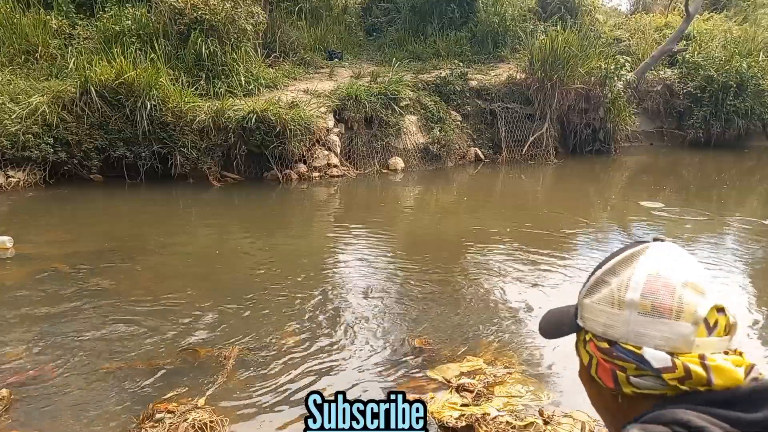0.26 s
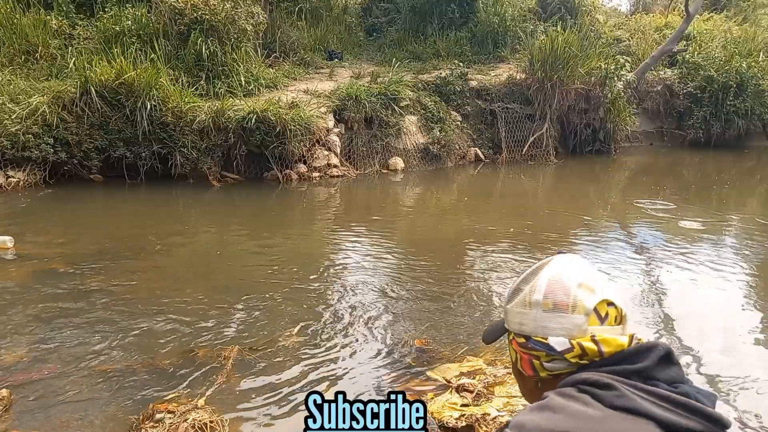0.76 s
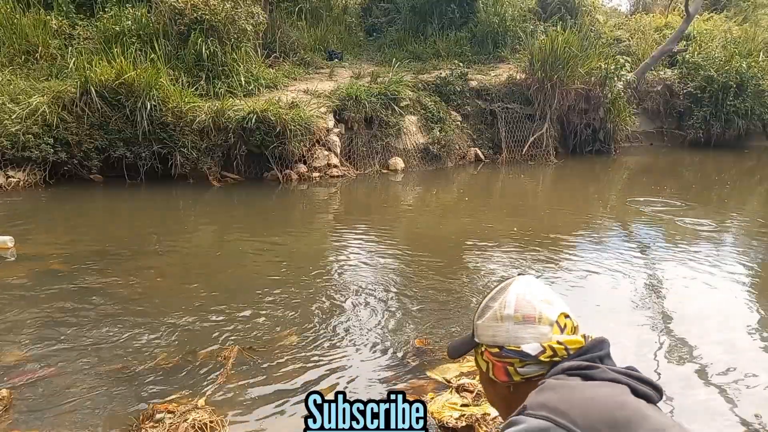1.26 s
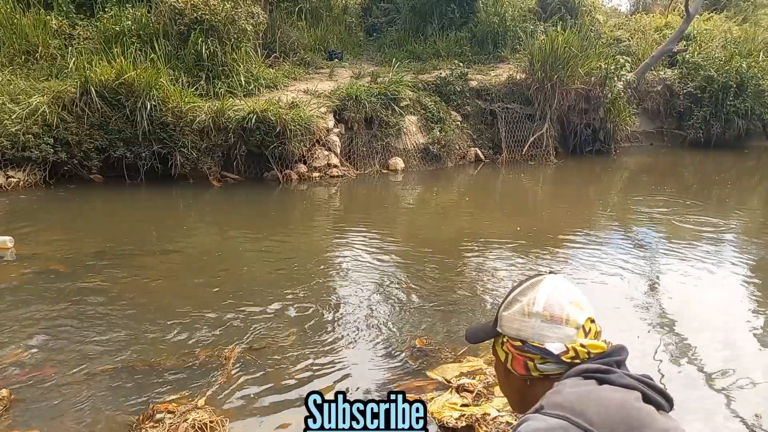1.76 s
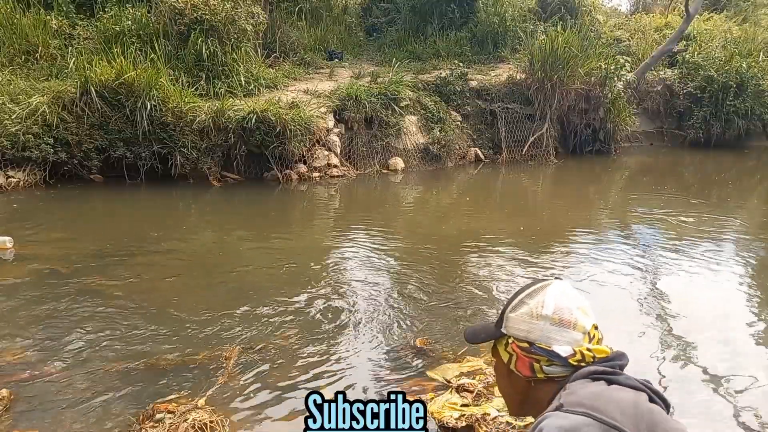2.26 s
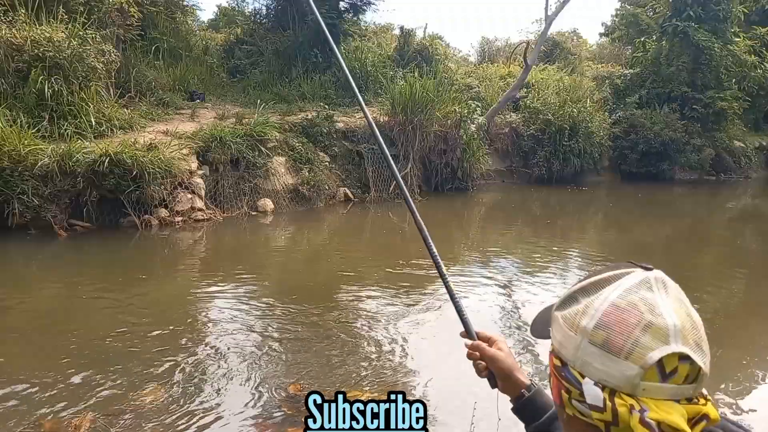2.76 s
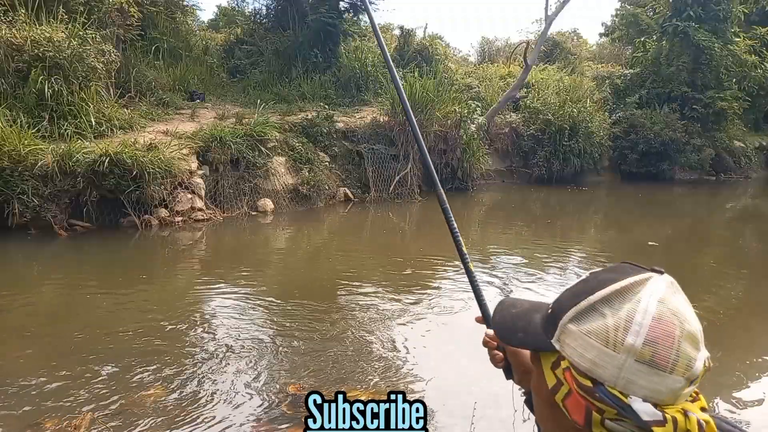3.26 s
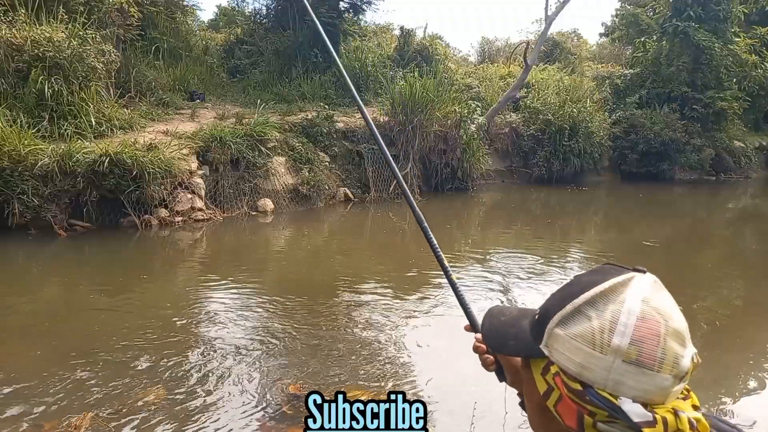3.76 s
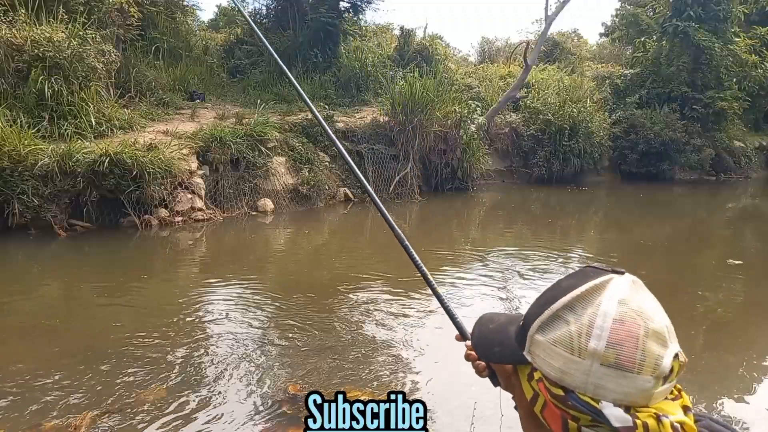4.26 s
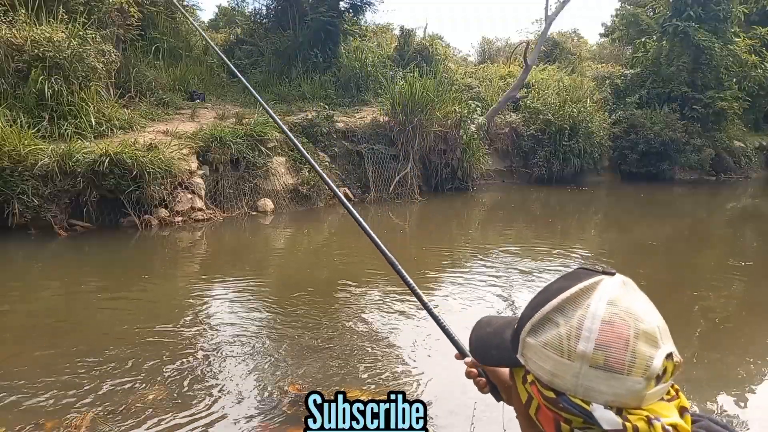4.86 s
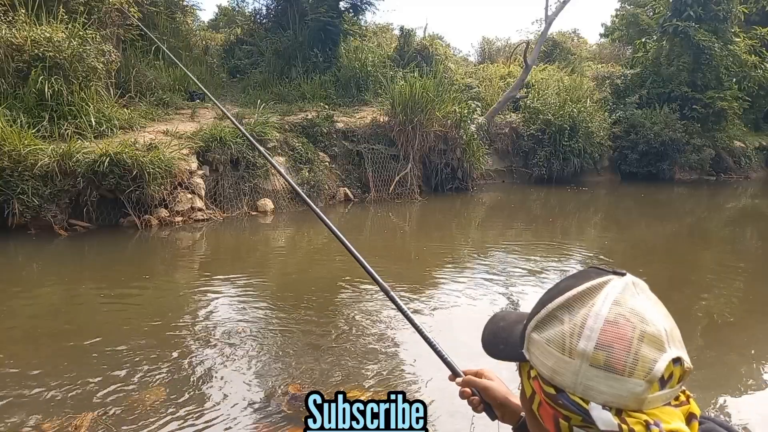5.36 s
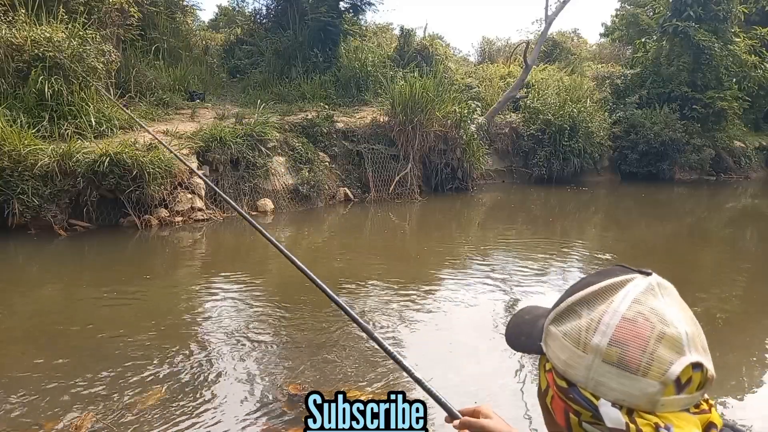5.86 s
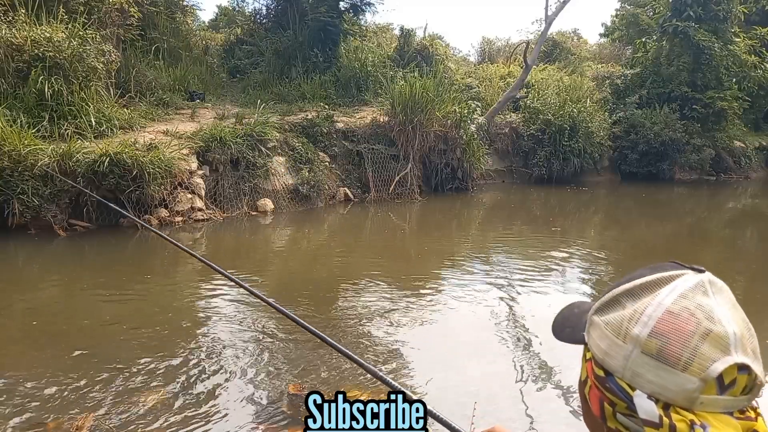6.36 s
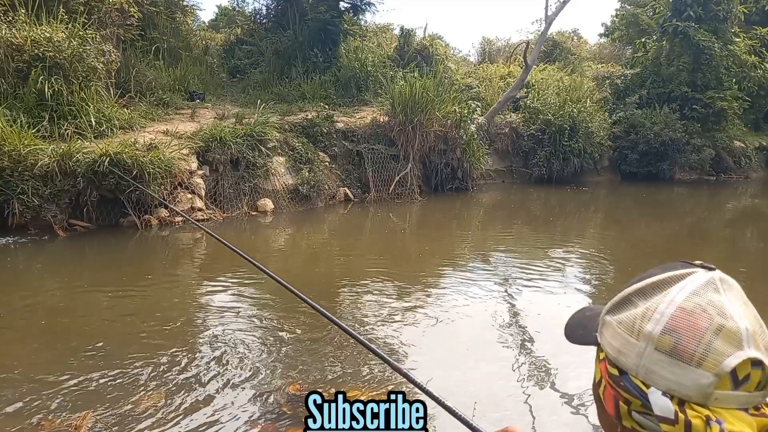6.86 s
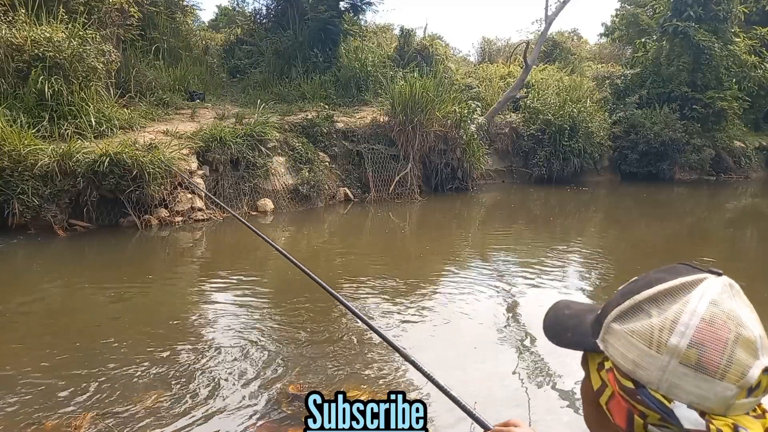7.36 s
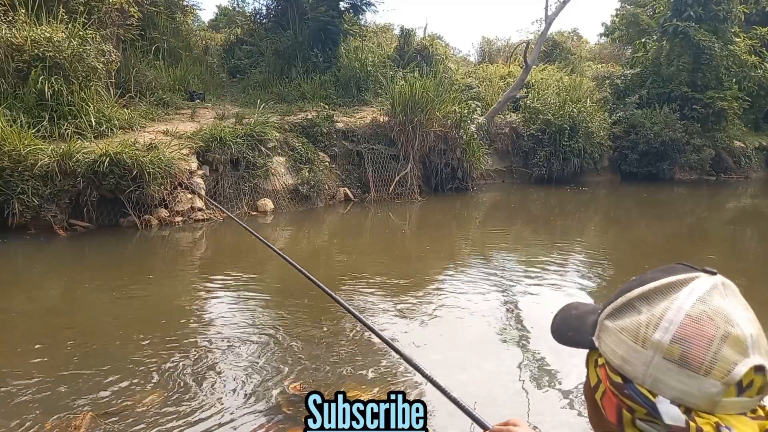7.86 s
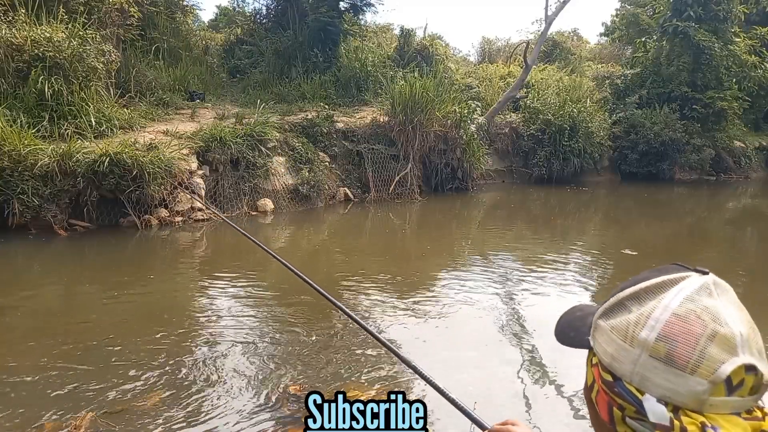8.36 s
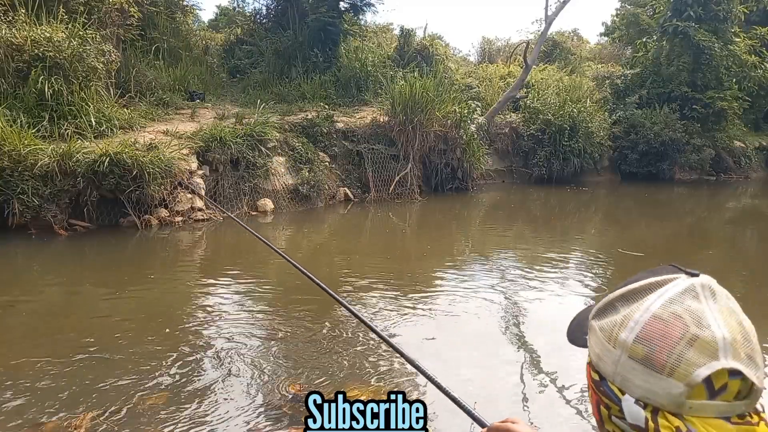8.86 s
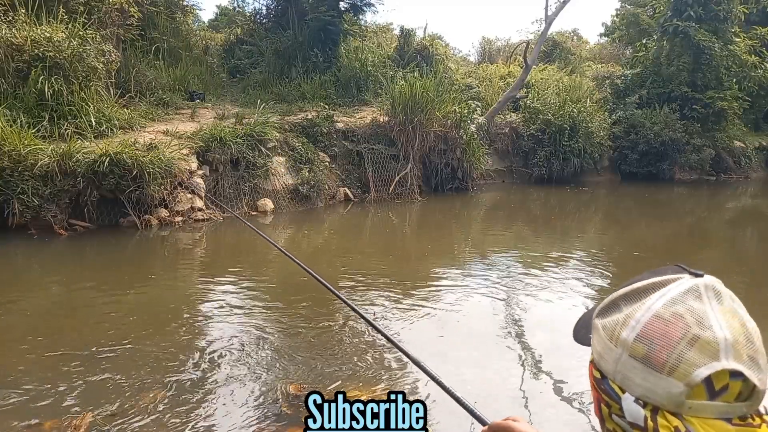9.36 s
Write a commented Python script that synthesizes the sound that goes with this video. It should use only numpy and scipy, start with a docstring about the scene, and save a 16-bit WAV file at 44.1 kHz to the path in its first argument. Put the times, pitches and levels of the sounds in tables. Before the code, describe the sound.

A shallow stream runs close by, slightly to the left, with ringing bubbles, small spills and crisp drop clicks. The liveliest splash comes a little over two seconds in. Irregular low wind thumps buffet the stereo microphones throughout. Thin insect buzzing sits high above, and a small bird gives four faint raspy chips past the middle. Distant traffic hums barely underneath.

```python
"""A shallow stream trickles over stones to the left: ringing bubbles, snapping drops and noisy fizz.
Low-passed noise thumps as wind in the two microphones, while far traffic hums in narrow noise bands.
Insects buzz high up as throbbing band noise; a faint broad hiss lies beside them for the first 2.725 s.
A small bird chips four times, each chip a falling resonance in noise."""
import sys
import numpy as np
from scipy import signal
from scipy.fft import rfft, irfft, next_fast_len
from scipy.io import wavfile
from scipy.ndimage import uniform_filter1d

SR = 44100
rng = np.random.default_rng(int(sys.argv[2]) if len(sys.argv) > 2 else 0)


def invert_db(level):
    """Linear amplitude ratio for a level in decibels (20 dB per decade), elementwise."""
    return 10 ** (np.asarray(level, dtype=float) / 20)


def persist_wave(psi):
    """Save psi, clipped to +-1, as 16-bit WAV."""
    counts = np.round(np.clip(psi, -1, 1) * 32767).astype(np.int16)
    wavfile.write(sys.argv[1], SR, np.atleast_2d(counts).T)


N = 423801
LEAD = 19  # samples by which water reaches the left microphone first

# how busily the water runs between spills: (time [s], babble level [dB], fizz relative to babble [dB])
WATER_FLOW = [(0, -53.5, 1.5), (1, -48.5, 1), (2.3, -47, -3.5), (2.7, -49.5, -3.5), (4.4, -53, -6),
              (4.8, -49, -3), (7.1, -47.5, -9), (8, -49, -3), (9.61, -51, 3)]
# spectral weighting of the fizz, also laid over the bird: (frequency [Hz], gain [dB])
FIZZ_BANDS = [(1500, -49), (3000, -4.5), (4400, -6.5), (5400, -3), (6500, 4.5), (7100, -3), (7600, -2)]
# abrupt upper limit of the water's treble: (frequency [Hz], gain [dB])
WATER_REACH = [(7200, 0), (7700, -36), (16000, -52)]


def stream():
    """Superposition: continuous running water with spills, bubbles and drops standing out, plus echoes."""
    running = running_water()
    water = invert_db(curve(WATER_FLOW)) * running + spills() + clear_bubbles()
    near_stones = banks(water, -3, .06)
    open_water = banks(drop_snaps(), -12, .14)  # drops land in the open, with weaker echoes
    # other riffles, one near each side
    apart = np.array([np.roll(running, N // 3), np.roll(running, N // 2)])
    riffles = invert_db(curve(WATER_FLOW) - 3.5) * apart
    return colour(near_stones + open_water + spatter() + riffles, WATER_REACH)


def running_water():
    """Many overlapping bubble resonances merge into babble; finer ones and bursting spray make fizz."""
    # weighting of the bubble sizes: (frequency [Hz], gain [dB])
    babble_bands = [(350, -14), (700, -6), (1100, -2.5), (1600, 1), (2300, 3), (3200, -4), (4500, 6)]
    babble = evened(colour(gurgles(404.0, 3487, .085, 3.4, count=480, size=6), babble_bands))
    droplets = evened(gurgles(2967, 7360, 0.07, 3.5, count=900, size=8))
    spray = evened(crackle(N, 2) * invert_db(5 * drift(0.07)))
    fizz = evened(colour(droplets + spray, FIZZ_BANDS))
    return babble + invert_db(curve(WATER_FLOW, axis=2)) * fizz


def spills():
    """Each spill entrains air: a short swarm of bubble resonances."""
    # (start [s], length [s], level before echoes [dB], centre frequency [Hz], spread [octaves])
    spill_rows = [(0.084, 0.14, -49, 779, 0.56), (0.214, 0.13, -51, 2226, 0.65),
                  (0.749, 0.22, -49.5, 593, 0.58), (0.791, 0.8, -62.5, 5350, 1.6),
                  (0.964, 0.14, -42, 1478, 2.4), (1.258, 0.13, -44.5, 1590, 2.2),
                  (1.587, 0.28, -52, 1359, 0.91), (1.82, 0.13, -45, 1807, 4.22),
                  (2.07, 0.091, -49, 1410, 1.1), (2.347, 0.1, -43, 1307, 2.27),
                  (2.348, 0.22, -56, 4740, 1.3), (3.241, 0.54, -49.5, 3925, 0.31),
                  (3.371, 0.41, -48, 708, 0.7), (3.727, 0.15, -47.5, 1427, 1.87),
                  (4.7, 0.34, -46.5, 1381, 1.77), (5.655, 0.04, -48, 2314, 0.53),
                  (5.799, 0.5, -50, 3750, 0.38), (6.56, 0.44, -53, 4280, 1.7), (6.653, 0.46, -48, 704, 1.8),
                  (6.722, 0.2, -58.5, 2610, 1.5), (7.1, 0.46, -51, 875, 2.15),
                  (7.664, 0.2, -49.5, 732, 0.62), (8.684, 0.51, -47.5, 3293, 0.91),
                  (8.822, 0.14, -44, 870, 0.42), (9.257, 0.076, -50, 3600, 0.46),
                  (9.435, 0.2, -46.5, 1160, 3.1)]
    out = np.zeros(N)
    for s, length, db, hz, octaves in spill_rows:
        add(out, s, invert_db(db) * spill(length, hz, octaves))
    return out


def clear_bubbles():
    """Damped oscillation of single air pockets, the clearest of the stream."""
    # (peak time [s], peak level before echoes [dB], frequency at the peak [Hz],
    #  glide [octaves/s], decay by 60 dB, at least 3 [cycles])
    bubble_rows = [(0.23, -29, 2370, 25, 17), (0.995, -23, 2760, 19, 15), (1.013, -30.5, 1150, 11.5, 39),
                   (1.283, -27, 966, -19, 18), (1.297, -22.5, 2670, 8, 22), (1.43, -35.5, 1380, 1.5, 78),
                   (1.63, -33, 695, 23, 54), (1.76, -37, 2340, 16, 100), (1.768, -32, 944, -14, 18),
                   (1.862, -38, 1530, 24, 56), (1.945, -34.5, 2780, 12.5, 70), (2.269, -30, 940, 10, 40),
                   (2.364, -16, 1300, 2, 12), (2.422, -28.5, 793, 5.5, 48), (2.5, -28, 1594, 2.5, 53),
                   (2.74, -34.5, 1110, 46, 33), (2.773, -28, 3395, 6.5, 90), (2.896, -31, 2170, 36, 35),
                   (2.915, -27.5, 793, 41, 21), (3.01, -37, 2175, 4, 117), (3.355, -26, 3640, -8, 64),
                   (3.395, -39.5, 560, 11.5, 37), (3.486, -19.5, 1540, 10, 19), (3.521, -18, 3530, -21, 19),
                   (3.578, -30.5, 740, 3, 14), (3.984, -28.5, 1893, 10, 54), (4.066, -22, 780, 35, 19),
                   (4.19, -32.5, 1880, 5, 30), (4.798, -27.5, 770, 19, 7.1), (5.1, -32.5, 672, 22.5, 34),
                   (5.217, -24.5, 2120, -38, 22), (5.314, -28, 695, 8, 70), (5.808, -32.5, 2034, 7, 38),
                   (5.822, -31.5, 3730, -1, 49), (5.978, -35.5, 1930, 3.5, 76), (6.21, -34.5, 404, 9, 7.1),
                   (6.684, -25.5, 530, 5, 3.3), (6.721, -15, 1156, -9, 16), (6.785, -35.5, 1000, 23, 50),
                   (7.153, -34, 1295, 13.5, 65), (7.734, -23.5, 780, 19, 11), (7.955, -22.5, 1917, 12, 39),
                   (7.995, -34, 873, 5, 20), (8.045, -30, 1620, 13, 20), (8.407, -29.5, 1940, -8, 8.2),
                   (8.52, -33, 1940, 1, 31), (9.484, -22.5, 683, 27, 12), (9.502, -29.5, 1900, -29, 31)]
    swell_cycles = 3.5
    out = np.zeros(N)
    for s, db, hz, glide, cycles in bubble_rows:
        rise = swell_cycles / hz
        ring = bubble(hz, glide, rise, max(cycles, 3) / hz)
        add(out, s - rise - LEAD / SR, invert_db(db) * ring)
    return out


def drop_snaps():
    """Impact excitation: each drop gives a short ring and a broader crack of noise."""
    # (ring start [s], ring peak level before echoes [dB], ring frequency [Hz], decay by 60 dB [ms])
    tick_rows = [(0.847, -21, 2450, 1.44), (1.115, -21.5, 5300, 2.4), (1.1418, -30, 3880, 8.8),
                 (1.266, -29.5, 5400, 7.9), (1.289, -25.5, 2380, 7), (1.695, -23, 3470, 1.6),
                 (1.7137, -22.5, 2230, 18.4), (1.907, -16.5, 3625, 9.3), (2.003, -19.5, 5340, 1.3),
                 (2.359, -5.5, 2460, 1.7), (2.376, -14, 5900, 3.5), (2.498, -31, 5400, 8.3),
                 (2.872, -27, 2200, 0.94), (3.4805, -23, 1500, 10), (3.519, -23.5, 4300, 3.5),
                 (3.915, -25, 5500, 8.6), (4.977, -19.5, 6220, 6.9), (5.054, -25, 6140, 8.7),
                 (5.0897, -22.5, 6400, 4.1), (6.591, -25, 3920, 9.3), (6.825, -17.5, 3150, 9.9),
                 (7.433, -30, 4040, 19), (7.4903, -30.5, 2040, 18), (9.423, -26.5, 6100, 20)]
    crack_ms, skirt_db = 2.5, -40  # a drop ringing for crack_ms cracks one octave up, shorter ones wider
    t = np.arange(SR // 10) / SR
    out = np.zeros(N)
    for s, db, hz, t60_ms in tick_rows:
        ring = bubble(hz, 0, t60_ms / 20 / 1000, t60_ms / 1000)
        top = hz * 2 ** (crack_ms / t60_ms)
        # 5 ms of room ahead of the burst for the filter's symmetric response
        burst = np.roll(rng.standard_normal(SR // 10) * invert_db(-60 * t / 0.018), SR // 200)
        crack = colour(burst, [(.6 * hz, skirt_db), (.8 * hz, 0), (top, 0), (1.3 * top, skirt_db)])
        add(out, s, invert_db(db) * ring)
        add(out, s - 1 / 200, invert_db(db) * 0.77 * crack / abs(crack).max())
    return out


def spatter():
    """A random point process of tiny drop rings, each panned by level and arrival time."""
    drops_per_s, spread_db, t60_s = 50, 3, .012
    out = np.zeros((2, N))
    for when, pitch, size, side, ring in rng.random((round(drops_per_s * N / SR), 5)):
        hz = 3300 * 2 ** (1.1 * pitch)
        tick = bubble(hz, 0, 0.00048, t60_s * (0.26 + ring ** 2))
        tick = invert_db(-spread_db * np.log(size + 0.0053)) * tick  # a few are much louder
        add(out[0], when * N / SR, np.sqrt(side) * tick)
        add(out[1], when * N / SR + .0003 * (side - .5), np.sqrt(1 - side) * tick)
    wet = [banks(channel, -5, .05)[k] for k, channel in enumerate(out)]
    return invert_db(-55 + 6 * drift(.15)) * np.array(wet)  # flurries


def spill(length, hz, octaves):
    """Resonances crowd the front of a spill; fine, widely spread ones blur into filtered noise spray."""
    u, v, w = rng.random((40, 3)).T
    # octaves/s: spills above 1700 Hz sink, deeper ones climb
    sag = .7 * np.log2(hz / 1700)
    when = length * (.4 * u + 0.51 * v ** 1.4)
    pitches = hz * 2 ** (octaves * (w - .5) - sag * when)
    bubbles = evened(swarm(when, pitches, 0.05 + .03 / octaves, 3))  # like-sized ones ring on
    u = np.linspace(0, 1, min(round(length * SR), len(bubbles)))
    droplets = crackle(SR, 3)[:len(u)]
    spray = evened(resonate(droplets, hz * 2 ** (-sag * length * u), 0.68 * hz * octaves))
    spray = spray * np.sin(np.pi * u ** 0.35) ** 2
    share = min(octaves, 1) * np.clip(hz / 6500, 0, 1) ** 3.5
    bubbles *= 1 - share
    bubbles[:len(u)] += 13.2 * share * spray
    return bubbles


def gurgles(low_hz, high_hz, life_s, spread_db, count, size):
    """Clustered random process: each clump lets loose a handful of bubbles of kindred pitch."""
    when, pitch = rng.random((count, 2)).T
    later, wide = rng.random((count, size)), rng.standard_normal((count, size))
    s = when[:, None] * N / SR + .09 * later
    hz = low_hz * (high_hz / low_hz) ** pitch[:, None] * 2 ** (.13 * wide)
    return np.pad(swarm(s.ravel(), hz.ravel(), life_s, spread_db), (0, N))[:N]


def swarm(mix_s, hz, life_s, spread_db, rise=.3, climb=.8):
    """Size-dependent damping: high bubbles die sooner and glide fewer octaves; a few are much louder."""
    out = np.zeros(round(mix_s.max() * SR) + SR // 4)
    for s, f, (a, b, c) in zip(mix_s, hz, rng.random((len(hz), 3))):
        small = np.sqrt(1000 / f)
        life = np.clip(life_s * invert_db(17.7 * (a - 1.0)) * small ** 1.676, .001, .13)
        glide = climb * small * (b - .2) / life
        add(out, s, invert_db(-spread_db * np.log(c + 0.0033)) * bubble(f, glide, rise * life, life))
    return out


def bubble(hz, glide, rise, t60):
    """Resonance of an air pocket: it swells, then decays while its pitch slides by glide octaves/s."""
    t = np.arange(-rise, t60, 1 / SR)
    swell = np.sin(np.pi / 2 * (1 + t / rise)) ** 2
    # both branches are computed; the decay is used only from t = 0
    shape = np.where(t < 0, swell, invert_db(-60 * (t / t60) ** 2.1))
    pitch = np.clip(hz * 2 ** (glide * t), 0, SR / 3)
    return shape * np.sin(2 * np.pi * np.cumsum(pitch) / SR)


def crackle(size, depth_db):
    """Amplitude modulation of noise: the level jumps as tiny droplets burst."""
    jumps = evened(uniform_filter1d(rng.exponential(1, size) ** 3 - 6, round(0.00065 * SR)))
    return rng.standard_normal(size) * invert_db(depth_db * np.clip(jumps, -2, 4))


def wind():
    """Turbulent pressure at the microphones: mostly shared low noise whose size follows the gusts."""
    # spectrum of the turbulence: (frequency [Hz], gain [dB])
    wind_bands = [(15, -62), (25, -54), (56, -7), (75, 8), (91, 3.5), (146, -8.5), (184, -16.5), (230, -26),
                  (300, -29), (510, -120)]
    # tighter, higher thumps: (time 15.3 ms ahead of the peak [s], level before the side offset [dB],
    #  frequency at the peak [Hz])
    buffets = [(3.744, -21.5, 128.4), (5.365, -25.5, 146), (7.368, -26.5, 160.5)]
    air = colour(pair(*rng.standard_normal((2, N)), 0.82), wind_bands)
    # halves the slow level swings in dB, so that the gusts set the level
    air /= uniform_filter1d((air ** 2).mean(0), round(0.077 * SR)) ** 0.25
    thumps = np.zeros(N)
    for s, db, hz in buffets:
        add(thumps, s - .04, invert_db(db) * bubble(hz, 8.2, 0.0553, 0.016))
    flow_noise = gusts() * invert_db(np.array([[.8], [-.4]])) * evened(air)
    return flow_noise + thumps * invert_db(np.array([[1.5], [-1.5]]))


def gusts():
    """Powers add: rounded gusts on top of a fluttering breeze give the wind's strength."""
    # the strongest gusts: (start [s], length [s], level before the side offset [dB])
    gust_rows = [(0, 0.023, -27), (0.184, 0.18, -33), (0.393, 0.026, -30.5), (0.55, 0.078, -31.5),
                 (1.575, 0.14, -33.5), (1.734, 0.06, -31), (1.874, 0.16, -29.5), (2.392, 0.062, -35.5),
                 (2.99, 0.02, -32.5), (3.11, 0.14, -32), (3.607, 0.38, -33.5), (4.542, 0.081, -34.5),
                 (4.69, 0.19, -32.5), (4.945, 0.14, -26), (5.283, 0.056, -31), (5.622, 0.12, -31.5),
                 (6.455, 0.096, -34), (6.76, 0.069, -30.5), (8.82, 0.037, -27), (8.944, 0.052, -38),
                 (9.35, 0.038, -33)]
    lull_db, flutter_db, flutter_s, edge_s = -38, 4.5, .04, 0.013
    t = np.arange(N) / SR
    power = invert_db(lull_db + flutter_db * drift(flutter_s)) ** 2
    for start, length, db in gust_rows:
        # flat for half the length, with soft flanks
        beyond = np.maximum(abs(t - start - length / 2) - length / 4, 0)
        power = power + invert_db(db) ** 2 * np.exp(-(beyond / (edge_s + length / 8)) ** 2)
    return np.sqrt(power)


def insects():
    """Band-limited stridulation: a near singer on the left and a wide high chorus, beside an early hiss."""
    # levels before the side offsets: (time [s], lower singer [dB], upper chorus [dB])
    insect_levels = [(0, -71, -53.5), (1.5, -68.5, -58.5), (2.71, -68, -58), (2.74, -64, -54),
                     (5.3, -60, -60), (6.8, -57.5, -53), (8.6, -57, -57.5), (9.61, -56, -58)]
    # body spectrum of the near singer: (frequency [Hz], gain [dB])
    low_body = [(8600, -41), (9300, -16.5), (9850, 1.5), (10250, -10.5), (10600, -41), (11500, -25),
                (12200, -93)]
    # body spectrum of the chorus: (frequency [Hz], gain [dB])
    high_body = [(12500, -53), (14000, -28), (14800, -1.5), (15700, 3), (16500, -42)]
    # spectrum of the faint broad hiss: (frequency [Hz], gain [dB])
    hiss_bands = [(7600, -14), (8600, -5), (10400, -8.5), (11000, -14), (11800, 5), (12500, -58)]
    low_level = invert_db(curve(insect_levels) + np.array([[3.5], [-1.5]]))
    high_level = invert_db(curve(insect_levels, axis=2) + np.array([[3.5], [1.5]]))
    low = low_level * buzz(low_body, 89.0, 0.4, 0.2)
    high = high_level * buzz(high_body, 23.7, 0.14, 0.13)
    heard_until_s = 2.725
    hiss = invert_db(-67.5) * buzz(hiss_bands, 61, 0.57, 0.12) * (np.arange(N) < heard_until_s * SR)
    return low + high + hiss


def buzz(body, per_s, depth, same):
    """Amplitude modulation: noise throbs per_s times a second, swells slowly and takes a given spectrum."""
    rate = per_s * (1 + 0.0175 * drift(0.331))
    throb = 1 + depth * np.cos(2 * np.pi * np.cumsum(rate) / SR)
    noise = pair(*rng.standard_normal((2, N)), same)
    return evened(colour(noise * throb * invert_db(2.74 * drift(0.041)), body))


def bird():
    """Noise through a falling resonance makes raspy chips, with scattered echoes."""
    # (time [s], level before echoes [dB], starting frequency of the resonance [Hz])
    chips = [(5.684, -38, 6760), (5.897, -40, 6800), (6.256, -39.5, 6600), (6.516, -33.5, 6470)]
    out, t = np.zeros(N), np.arange(round(.095 * SR)) / SR
    envelope = np.minimum(t / 0.014, 1) * np.cos(np.pi / 2 * t / t[-1])
    for s, db, hz in chips:
        rasp = resonate(rng.standard_normal(SR)[:len(t)], hz * 2 ** (-1.5 * t), 520)
        add(out, s, invert_db(db) * evened(colour(rasp, FIZZ_BANDS)) * envelope)
    return banks(out, -8.5, 0.38)


def traffic():
    """Narrow-band noise: throbbing, wavering tones of far traffic fade in and out."""
    # (start [s], end [s], centre frequency [Hz], level before fades and echoes [dB])
    hum_rows = [(1.182, 2.703, 313, -48.5), (5.6, 7.5, 153, -49)]
    out = np.zeros(N)
    for start, end, hz, db in hum_rows:
        span = slice(round(start * SR), round(end * SR))
        narrow = resonate(rng.standard_normal(N), hz * (1 + .04 * drift(.15)), 60)
        tone = evened(narrow * invert_db(3 * drift(.05)))[span]
        out[span] += invert_db(db) * tone * signal.windows.tukey(len(tone), .6)
    return banks(out, 0, .2)


def wash():
    """Many distant sources sum to smooth noise: far water from the same side as the stream."""
    # spectrum of the far water: (frequency [Hz], gain [dB])
    wash_bands = [(40, -70), (150, -6.5), (310, 1), (500, -9), (1200, -12.5), (2200, -11.5), (3500, -25.5),
                  (6500, -33.5)]
    far = colour(colour(pair(*rng.standard_normal((2, N)), 0.7), wash_bands), WATER_REACH)
    return invert_db(-49.5 + 2.5 * drift(0.041)) * evened(far)


def banks(x, wet_db, t60):
    """Diffuse reflection: direct sound plus echoes from stones and banks, other ones on each side."""
    t = np.arange(round(t60 * SR)) / SR
    taps = rng.standard_normal((2, SR))[:, :len(t)] * invert_db(-60 * t / t60) * (t > .002)
    echoes = signal.oaconvolve(x[None], taps / np.linalg.norm(taps[0]), axes=1)[:, :N]
    return x + invert_db(wet_db) * echoes


def pair(left, right, same):
    """Partial coherence: two microphones hear a shared part and a part of their own."""
    same = np.clip(same, 0, 1)
    return np.array([left, same * left + np.sqrt(1 - same ** 2) * right])


def resonate(x, hz, width_hz):
    """Heterodyne resonance: shift hz to zero, smooth twice, shift back."""
    turn = np.exp(2j * np.pi * np.cumsum(hz * np.ones(x.shape[-1])) / SR)
    r = np.exp(-np.pi * width_hz / SR)
    return 2 * (turn * signal.lfilter([(1 - r) ** 2], [1, -2 * r, r * r], x / turn)).real


def colour(x, points):
    """Linear filtering: multiplies the spectrum by a gain curve, without phase shift."""
    size = next_fast_len(x.shape[-1])
    gain = invert_db(read(points, np.fft.rfftfreq(size, 1 / SR)))
    return irfft(rfft(x, size) * gain, size)[..., :x.shape[-1]]


def read(points, hz):
    """Logarithmic frequency scale: value of a spectrum at hz, straight between points."""
    f, value = np.transpose(points)
    return np.interp(np.log(hz + 1), np.log(f + 1), value)


def curve(rows, axis=1):
    """Linear interpolation in time: one column of a table at every sample."""
    rows = np.array(rows)
    return np.interp(np.arange(N) / SR, rows[:, 0], rows[:, axis])


def drift(seconds):
    """Smoothed random fluctuation: noise averaged twice over a window, at rms 1."""
    size = max(round(seconds * SR), 2)
    return evened(uniform_filter1d(uniform_filter1d(rng.standard_normal(N), size), size))


def evened(x):
    """Power normalisation: scales to rms 1."""
    return x / np.sqrt(np.mean(x ** 2) + 1e-20)


def add(mix, s, sound):
    """Superposition: mixes a sound in from time s."""
    part = mix[max(round(s * SR), 0):][:len(sound)]
    part += sound[:len(part)]


def scene():
    """Time and level differences: sounds from the left reach the right microphone later and weaker."""
    side = stream() + wash() + bird()
    side[1] = np.roll(side[1], LEAD)
    return side * invert_db(np.array([[.3], [-.3]])) + wind() + insects() + traffic()


def low_pass(x):
    """Removes everything above the highest recorded frequency."""
    return signal.sosfilt(signal.butter(12, 17150, fs=SR, output="sos"), x)


def record(dry):
    """Band limitation: the microphones' signal passes a steep linear-phase low-pass."""
    edge_hz = 15850
    edge = signal.firwin(801, edge_hz, window=("kaiser", 9), fs=SR)
    mix = signal.oaconvolve(dry, edge[None], "same", axes=1)
    return low_pass(mix)


dry = scene()
out = record(dry)
persist_wave(out)
```